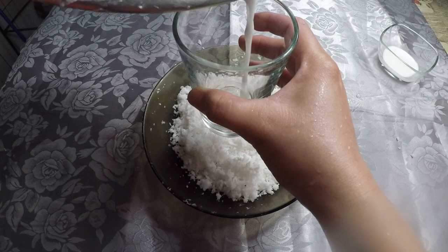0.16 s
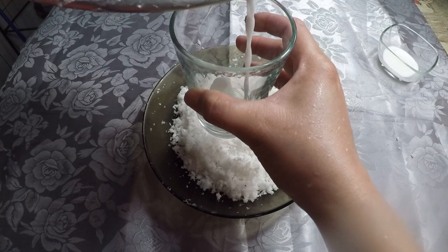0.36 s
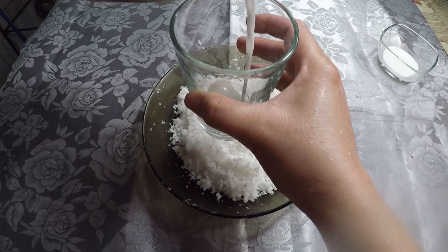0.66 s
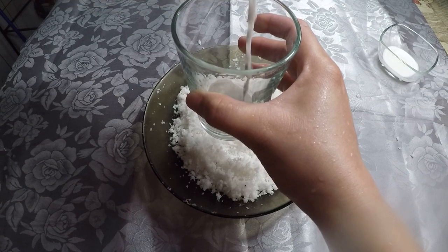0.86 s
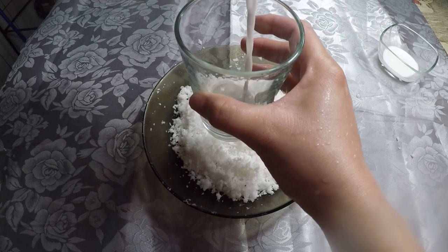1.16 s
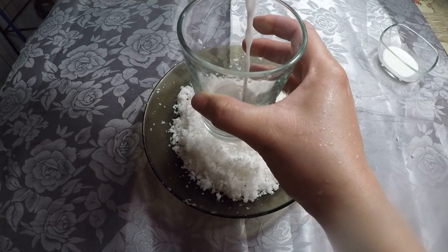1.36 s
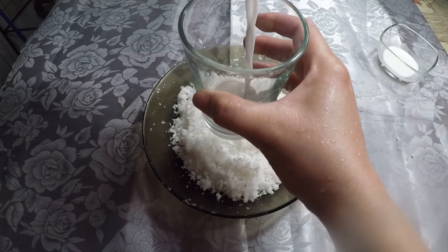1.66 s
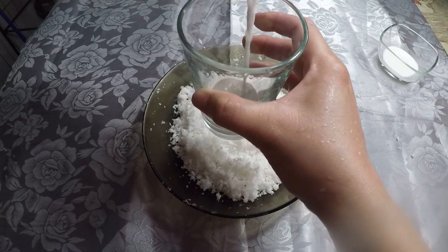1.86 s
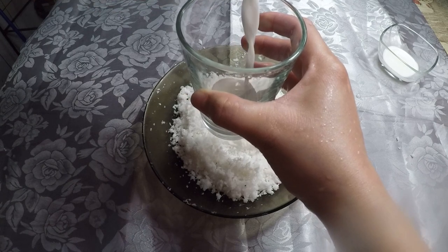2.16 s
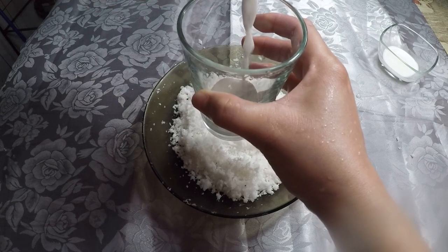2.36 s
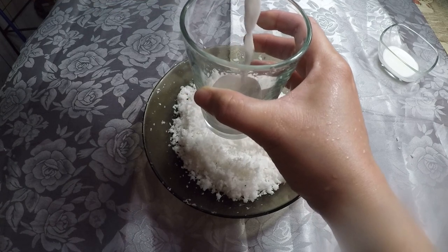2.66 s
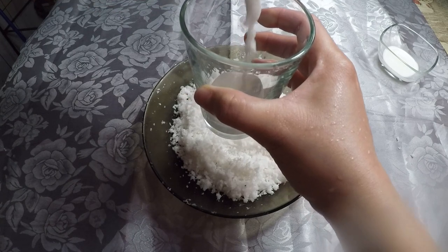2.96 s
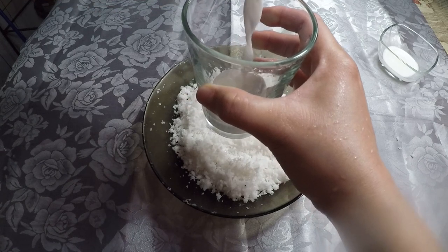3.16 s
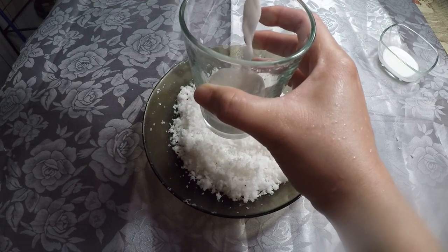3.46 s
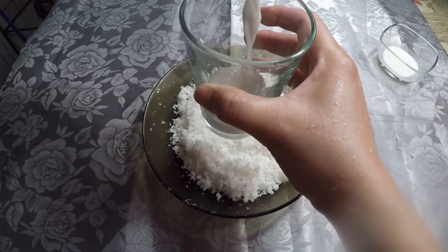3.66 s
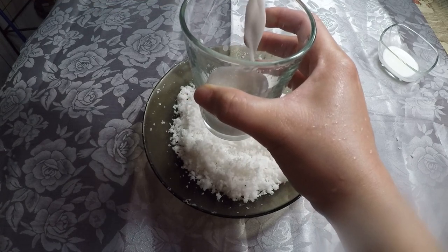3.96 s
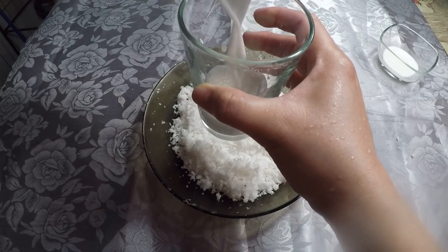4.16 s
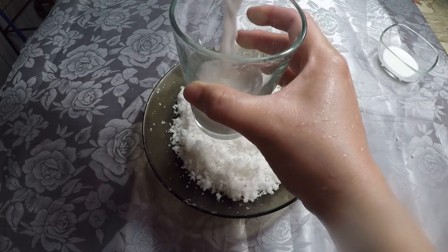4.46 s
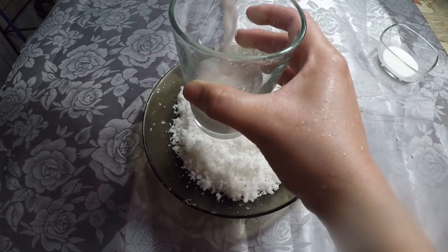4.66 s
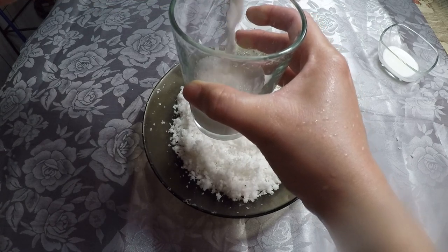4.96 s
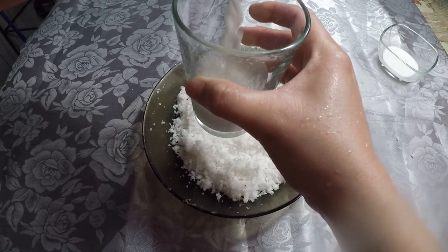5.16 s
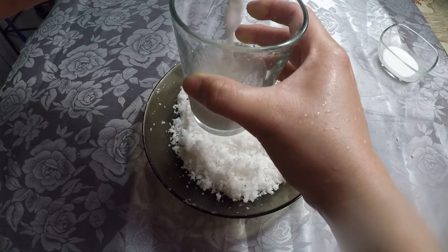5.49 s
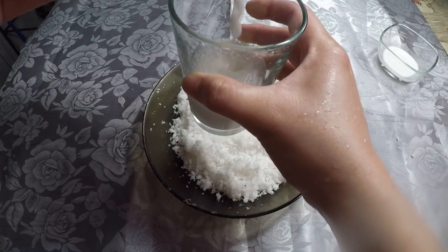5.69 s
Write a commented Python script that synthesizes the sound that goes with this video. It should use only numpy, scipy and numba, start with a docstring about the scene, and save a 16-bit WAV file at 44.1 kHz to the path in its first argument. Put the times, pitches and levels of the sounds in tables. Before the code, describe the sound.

Coconut milk squeezed by hand falls into a drinking glass in a quiet kitchen. A few light drips tick first, then a thin trickle starts, fizzing with tiny bubbles and spitting fine spray against the ringing glass. Hollow gurgles swell to their loudest midway, then ease as low plops join in the deepening liquid. The microphone is very close, with a faint room hum behind.

```python
"""Coconut milk is wrung out by hand into a tumbler close to a small two-port microphone.
Over a quiet kitchen hum and the rumble of a hand on the table, the first drops tick at 0.4 s.
From 0.9 s a trickle runs: small bubbles fizz, chirp and ring the walls, and spray spits.
Large bubbles gulp through the air column of the glass, loudest from 2 to 3.3 s.
From 3.5 s the pool is deeper and low plops join in."""
import sys
import numpy as np
from scipy import signal
from scipy.fft import rfft, irfft, next_fast_len
from scipy.io import wavfile
from scipy.ndimage import uniform_filter1d
from numba import njit

SR = 44100
rng = np.random.default_rng(int(sys.argv[2]) if len(sys.argv) > 2 else 0)


def log_audio(samples):
    """Write samples as a 16-bit WAV file to the path given in sys.argv[1]."""
    # one column per channel
    frames = np.atleast_2d(samples).T
    # limit to full scale, then quantise
    limited = np.clip(frames, -1, 1)
    pcm = np.round(limited * 32767).astype(np.int16)
    wavfile.write(sys.argv[1], SR, pcm)


N = 257103
FFT_SIZE = next_fast_len(N + 12000)
TIME_S = np.arange(N) / SR


def undb(db):
    return 10 ** (np.asarray(db) / 20)


def unit_rms(x):
    return x / np.sqrt(np.mean(x ** 2))


def decay(t, t60_s):
    return np.exp(-np.log(1000) * t / t60_s)


def at_time(table, s):
    return np.interp(s, *np.transpose(table))


def per_bin(table):
    """A (Hz, value) table read at every FFT bin."""
    hz, value = np.transpose(table)
    bin_hz = np.arange(FFT_SIZE // 2 + 1) * SR / FFT_SIZE
    return np.interp(np.log(bin_hz + 1), np.log(hz), value)


def fft_filter(x, bin_gain):
    return irfft(rfft(x, FFT_SIZE) * bin_gain, FFT_SIZE)[..., :N]


@njit
def moving_bandpass(x, hz, width_hz):
    """State-variable filter, gain 1 at its moving centre."""
    y, band_state, low_state = np.empty(len(x)), 0., 0.
    for i in range(len(x)):
        g, damping = np.tan(np.pi * hz[i] / SR), width_hz / hz[i]
        band = (band_state + g * (x[i] - low_state)) / (1 + g * (g + damping))
        band_state = 2 * band - band_state
        low_state += 2 * g * band
        y[i] = damping * band
    return y


def place(out, start_s, grain, peak_db):
    i = int(start_s * SR)
    n = min(len(grain), N - i)
    out[i:i + n] += grain[:n] * undb(peak_db) / np.abs(grain).max()


def bubble(hz, t60_s, glide, samples, rise_cycles=0.1):
    """A dying sine whose pitch climbs by the share glide within one t60."""
    t = np.arange(samples) / SR
    swell = 1 - np.exp(-t * hz / rise_cycles)
    return swell * np.sin(2 * np.pi * hz * (t + glide * t ** 2 / (2 * t60_s))) * decay(t, t60_s)


@njit
def froth(start_s, hz, gain, t60_cycles, glide):
    """Many bubbles: each swells for about a cycle, climbs in pitch and dies."""
    out = np.zeros(N)
    for k in range(len(start_s)):
        start, step = int(start_s[k] * SR), hz[k] / SR
        for i in range(min(int(t60_cycles / step), N - start)):
            turns = i * step
            envelope = (1 - np.exp(-turns)) * np.exp(-np.log(1000) * turns / t60_cycles)
            phase = 2 * np.pi * turns * (1 + glide * turns / (2 * t60_cycles))
            out[start + i] += gain[k] * envelope * np.sin(phase)
    return out


# Hum spectrum. Each row: frequency in Hz, relative density in dB.
HUM_SPECTRUM = [(62, -79), (105, -19.5), (173, -2.5), (286, -8), (346, -11), (514, -9), (633, -17),
                (703, -8.5), (781, -11.5), (4710, -32), (9990, -28.5), (15500, -24)]
# Each row: frequency in Hz, left-right correlation of the hum.
HUM_CORRELATION = [(60, -1.3), (130, 0.059), (290, -0.25), (640, -0.78), (1410, -0.71), (3100, -0.071),
                   (6820, 0.13), (15000, -0.35)]


def kitchen_hum():
    """Steady room noise; the two ports hear its midrange partly in opposition."""
    correlation = np.clip(per_bin(HUM_CORRELATION), -.95, .95)
    spectrum = undb(per_bin(HUM_SPECTRUM))
    mid, side = rng.standard_normal((2, N))
    mid = fft_filter(mid, spectrum * np.sqrt(1 + correlation))
    side = fft_filter(side, spectrum * np.sqrt(1 - correlation))
    hum = unit_rms(np.array([mid + side, mid - side]))
    return undb(-46.5) * signal.sosfilt(signal.butter(4, 120, "highpass", fs=SR, output="sos"), hum)


# Rumble envelope. Each row: time in seconds, level in dB.
RUMBLE_LEVEL = [(0.0, -66), (1.04, -77), (3.0, -76), (5.8, -90)]


def hand_rumble():
    """Dull noise of the hand on the table, partly shared by both ports."""
    lowpass = signal.butter(3, 75, fs=SR, output="sos")
    common, left, right = signal.sosfilt(lowpass, rng.standard_normal((3, N)))
    return unit_rms(np.array([left, right]) + 0.8 * common) * undb(at_time(RUMBLE_LEVEL, TIME_S))


def room_tail(x, t60_s=0.14):
    """Short diffuse reflections from table and walls, different at each port."""
    t = np.arange(12000) / SR
    tail = rng.standard_normal((2, len(t))) * decay(t, t60_s) * (t > .003)
    tail /= np.sqrt(np.sum(tail ** 2, axis=1, keepdims=True))
    tail = signal.lfilter(*signal.butter(1, [1800, 9000], "bandpass", fs=SR), tail)
    return undb(-8.5) * fft_filter(x, rfft(tail, FFT_SIZE))


# The running stream. Each row: time in seconds, gurgle in dB, air column in Hz, chirping in dB,
# fizz in dB, crosswise air mode in Hz.
STREAM = [(0.9, -68, 800, -66, -68, 6350), (1.15, -67, 830, -56, -51, 6840),
          (1.45, -49, 873, -49.5, -60, 6000), (1.74, -53, 917, -49.5, -53.5, 5660),
          (2.0, -35.5, 933, -44.5, -54, 6100), (2.29, -30, 907, -46.5, -52, 6050),
          (2.84, -24.5, 814, -39, -45, 6070), (3.4, -33.5, 825, -47.5, -47.5, 6200),
          (3.75, -39, 841, -40.5, -48.5, 6070), (4.11, -45, 964, -45, -47.5, 6300),
          (4.7, -39, 1042, -42, -50.5, 6100), (5.4, -44, 1087, -45.5, -50.5, 6200),
          (5.83, -41.5, 1087, -43, -55, 6850)]
GURGLE_DB, AIR_COLUMN_HZ, CHIRPING_DB, FIZZ_DB, CROSS_MODE_HZ = range(1, 6)  # column indices
STREAM_START_S = STREAM[0][0]


def stream(column, s):
    table = np.array(STREAM)
    return np.interp(s, table[:, 0], table[:, column])


def scatter(per_s, spread_db):
    """Random events while the stream runs: start in seconds, size in dB, pitch share 0-1."""
    draws = rng.random((int(per_s * N / SR), 3))
    when, size, share = draws[draws[:, 0] * N / SR > STREAM_START_S].T
    size_db = -spread_db * np.log(1 - .95 * size)  # mostly near 0 dB, bounded
    return when * (N - 1) / SR, size_db, share


# The clearest spits of spray. Each row: start in seconds, level in dB.
SPITS = [(0.9339, -30), (0.988, -29), (1.1025, -39), (1.9756, -18), (2.0523, -34), (2.3088, -32),
         (2.3452, -29), (2.4244, -28.5), (2.5043, -28), (2.6844, -31), (2.7233, -32), (2.7752, -27),
         (2.8874, -37), (2.9279, -36), (3.1573, -25), (3.2661, -27), (3.2955, -35), (3.4262, -29),
         (3.5485, -26), (3.6462, -29), (3.7755, -27), (3.8548, -33), (4.0977, -35), (4.1421, -29),
         (4.5716, -35), (4.783, -31), (4.9228, -38), (4.9912, -27), (5.142, -43), (5.2261, -31),
         (5.264, -31), (5.3404, -31.5), (5.3982, -33), (5.4357, -29), (5.6392, -30), (5.6761, -30)]


def spray(over_fizz_db=3):
    """Very short bright bursts, listed and random, only partly alike at the two ports."""
    band = signal.butter(2, [8500, 15500], "bandpass", fs=SR, output="sos")
    t = np.arange(800) / SR
    envelope = (1 - np.exp(-t / 0.00038)) * decay(t, 0.026)
    start_s, size_db, _ = scatter(per_s=91, spread_db=2)
    events = list(SPITS) + list(zip(start_s, size_db + stream(FIZZ_DB, start_s) + over_fizz_db))
    noise = rng.standard_normal((len(events), 3, len(t)))
    common, separate = noise[:, :1], noise[:, 1:]
    bursts = signal.sosfilt(band, (common + 3.2 * separate) * envelope)
    out = np.zeros((2, N))
    for (s, db), (left, right) in zip(events, bursts):
        place(out[0], s, left, db)
        place(out[1], s, right, db)
    return out


# Colour of the small bubbles. Each row: frequency in Hz, relative gain in dB.
SWARM_COLOUR = [(760, -6.5), (1300, -18), (1410, 4), (1800, 0.5), (2200, 3.5), (2710, -5), (3240, 2),
                (3720, -8.5), (5260, -21), (6350, -13.5), (8890, -26), (14600, -16), (16000, -32)]


def swarm(level_column, per_s, lo_hz, hi_hz, t60_cycles, glide, spread_db):
    """Small bubbles of random size over a little spray noise, following the stream."""
    start_s, size_db, share = scatter(per_s, spread_db)
    bubbles = froth(start_s, lo_hz * (hi_hz / lo_hz) ** share, undb(size_db), t60_cycles, glide)
    band = signal.butter(2, [lo_hz, hi_hz], "bandpass", fs=SR, output="sos")
    hiss = signal.sosfilt(band, rng.standard_normal(N))
    coloured = fft_filter(unit_rms(bubbles) + 0.1 * unit_rms(hiss), undb(per_bin(SWARM_COLOUR)))
    level = undb(stream(level_column, TIME_S)) * (TIME_S > STREAM_START_S)
    return unit_rms(coloured) * flare() * level


def flare(depth_db=5, settle_s=0.013):
    """Swarm gain: each loud drop stirs up the small bubbles for a moment."""
    kicks = np.zeros(N)
    for s, db, *_ in CHIRPS + TICKS:
        kicks[int(s * SR)] += undb(db)
    stirred = signal.lfilter([1], [1, -np.exp(-1 / (settle_s * SR))], kicks)
    stirred = uniform_filter1d(stirred, size=400)
    return unit_rms(undb(depth_db * np.tanh(stirred / np.mean(stirred[stirred > 0]))))


# Mid-size bubbles chirping upward. Each row: start in seconds, level in dB, pitch in Hz, splash share.
CHIRPS = [(0.4145, -33, 1960, 0.2), (0.9678, -34.5, 2840, 0.37), (0.9976, -28, 1760, 0.22),
          (1.0284, -30.5, 1600, 0.16), (1.066, -34.5, 2000, 0.17), (1.1054, -23.5, 3640, 0.45),
          (1.1159, -16, 3370, 0.4), (1.142, -20, 3500, 0.45), (1.1743, -33.5, 2520, 0.03),
          (1.249, -30.5, 2320, 0.4), (1.274, -28.5, 2070, 0.3), (1.3106, -31, 1730, 0),
          (1.3257, -23.5, 3670, 0.6), (1.355, -29.5, 1850, 0.2), (1.397, -32.5, 1860, 0.43),
          (1.4332, -19, 1250, 0.35), (1.481, -27.5, 1245, 0.37), (1.5061, -25, 1415, 0.27),
          (1.5887, -36, 1530, 0.2), (1.601, -19, 1547, 0.23), (1.7079, -22.5, 1780, 0.34),
          (1.7988, -25, 1445, 0.4), (1.8339, -27.5, 1620, 0.23), (1.8633, -29, 1430, 0.3),
          (1.8918, -26, 3630, 0.34), (1.9838, -23, 2280, 0.16), (2.0484, -22, 2900, 0.34),
          (2.1292, -23.5, 2180, 0.28), (2.146, -31.5, 3350, 0.16), (2.203, -29.5, 2550, 0.3),
          (2.36, -31, 1610, 0.36), (2.4374, -25.5, 3450, 0.3), (2.4887, -28.5, 3160, 0.2),
          (2.55, -28, 2280, 0.4), (2.6604, -24, 1904, 0.23), (3.052, -23, 2150, 0.7),
          (3.097, -22.5, 2420, 0.4), (3.1592, -19.5, 3720, 0.3), (3.2285, -25.5, 1570, 0.56),
          (3.3104, -21.5, 3230, 0.5), (3.3836, -31, 2540, 0.25), (3.4328, -22, 2160, 0.26),
          (3.5493, -24.5, 3400, 0.5), (3.7135, -33, 1300, 0.36), (3.7664, -24, 1450, 0.3),
          (3.793, -22, 3240, 0.12), (3.8193, -20.5, 1410, 0.7), (3.8546, -33, 1330, 0.2),
          (3.934, -25.5, 1260, 0.48), (3.9545, -27, 2140, 0.15), (3.9932, -27.5, 2110, 0.1),
          (4.0446, -36, 2780, 0.1), (4.161, -29, 3080, 0.18), (4.2336, -26.5, 1600, 0.5),
          (4.2837, -20.5, 1620, 0.7), (4.402, -31.5, 3200, 0.1), (4.4313, -27, 3900, 0),
          (4.444, -23.5, 3300, 0.37), (4.4783, -24.5, 2950, 0.47), (4.5188, -20, 3360, 0.32),
          (4.5575, -27, 3300, 0.2), (4.7266, -33, 1570, 0.4), (4.7845, -27, 3100, 0.2),
          (4.8209, -25, 3210, 0.57), (4.8569, -27, 3180, 0.1), (4.9232, -31, 3140, 0.32),
          (4.9673, -32.5, 3130, 0), (5.0203, -34, 1580, 0), (5.0447, -37, 1870, 0.1),
          (5.143, -20.5, 2180, 0.32), (5.2268, -28, 1420, 0.4), (5.2669, -20.5, 1560, 0.8),
          (5.433, -22.5, 1400, 0.42), (5.4572, -24.5, 3240, 0.54), (5.5207, -24.5, 2110, 0.17),
          (5.5827, -26.5, 1450, 0.3), (5.6168, -28, 2720, 0.2), (5.679, -33, 2480, 0),
          (5.6982, -25, 1940, 0.14)]
# Ticks on glass and surface. Each row: start in seconds, level in dB, pitch in Hz, splash share.
TICKS = [(0.4788, -33, 5880, 0.2), (0.5397, -27.5, 5170, 0.14), (0.6833, -37, 6640, 0.6),
         (0.7422, -47, 5800, 0.3), (0.9338, -37.5, 7400, 0.34), (0.9507, -31, 5270, 0.3),
         (1.0515, -34.5, 7230, 0.3), (1.1029, -21, 6830, 0.17), (1.1164, -26, 5200, 0.1),
         (1.1418, -22.5, 6650, 0), (1.2037, -39, 7110, 0.3), (1.2406, -30, 6760, 0.33),
         (1.3019, -25.5, 4430, 0.85), (1.3423, -31.5, 4260, 0.36), (1.6152, -33.5, 4200, 0),
         (1.7724, -28.5, 4230, 0.65), (1.9245, -26, 5850, 0.3), (1.9759, -31, 8440, 0.2),
         (2.1311, -32, 5850, 0.22), (2.228, -41.5, 5630, 0.16), (2.2762, -36, 5800, 0.4),
         (2.3331, -32.5, 6300, 0.4), (2.3461, -28, 6040, 0.34), (2.4239, -32, 5950, 0.3),
         (2.4379, -28, 4200, 0.3), (2.4588, -36, 6490, 0.3), (2.4793, -21.5, 6430, 0.3),
         (2.5301, -19.5, 4460, 0.37), (2.6209, -36, 5700, 0.1), (2.6359, -25, 4420, 0.17),
         (2.6843, -27, 5980, 0.22), (2.7566, -26, 4300, 0.1), (2.7751, -26.5, 6200, 0.45),
         (2.8085, -30, 6200, 0.14), (2.827, -26, 5870, 0.3), (2.9277, -22, 6380, 0.22),
         (2.9374, -21, 5850, 0.4), (2.9537, -29, 5900, 0.22), (3.0026, -31.5, 5760, 0.1),
         (3.0579, -30.5, 6200, 0.32), (3.0874, -30.5, 6000, 0.22), (3.1288, -23.5, 5870, 0.35),
         (3.1587, -24, 6270, 0.05), (3.245, -30, 6370, 0.4), (3.2665, -22.5, 5830, 0.5),
         (3.2959, -19.5, 4440, 0.26), (3.3304, -25, 6100, 0.1), (3.3363, -24.5, 6060, 0.13),
         (3.3852, -26, 5810, 0.3), (3.4266, -24.5, 4450, 0.5), (3.4925, -33.5, 5960, 0.3),
         (3.5104, -27.5, 6350, 0.2), (3.5483, -24, 4700, 0.34), (3.5897, -31, 6330, 0.6),
         (3.6062, -29, 6500, 0.22), (3.6466, -22.5, 4760, 0.44), (3.6765, -36, 4810, 0.22),
         (3.7209, -23, 6200, 0.24), (3.7763, -28, 4940, 0.3), (3.8551, -27.5, 4900, 0.55),
         (3.9938, -29, 4650, 0.45), (4.0442, -32.5, 4470, 0.3), (4.0687, -35, 4350, 0.1),
         (4.13, -32, 5900, 0.22), (4.2023, -26.5, 4770, 0.14), (4.2278, -30.5, 5550, 0.3),
         (4.245, -25, 4740, 0.4), (4.2842, -24, 5630, 0.46), (4.2994, -27, 5460, 0.5),
         (4.4014, -37, 6190, 0.22), (4.4194, -25, 5700, 0.36), (4.4308, -22, 4900, 0.22),
         (4.4433, -22, 5170, 0.22), (4.5301, -31, 7360, 0.1), (4.6009, -24.5, 6600, 0.06),
         (4.6179, -27.5, 5920, 0.16), (4.7306, -27, 7420, 0), (4.779, -29, 5800, 0.56),
         (4.8728, -29, 6750, 0.02), (4.9222, -22, 6770, 0.18), (4.9901, -30, 6800, 0.3),
         (5.0165, -26, 5530, 0.34), (5.0449, -28.5, 6700, 0.2), (5.0569, -31, 6540, 0),
         (5.1427, -23, 6370, 0.46), (5.2265, -25, 3930, 0.37), (5.2674, -27.5, 6600, 0.3),
         (5.3667, -31.5, 6650, 0.35), (5.3981, -32, 7100, 0.47), (5.4375, -34, 6540, 0.3),
         (5.4735, -22.5, 4300, 0.7), (5.5209, -24, 5960, 0.25), (5.6156, -40, 6740, 0.1),
         (5.6386, -32.5, 6360, 0.1)]


def drops(table, t60_cycles, glide, relative_width, splash_t60_s, rise_s=0.00043):
    """Each drop is a small bubble mixed with short splash noise around its pitch."""
    out, t = np.zeros(N), np.arange(1500) / SR
    envelope = (1 - np.exp(-t / rise_s)) * decay(t, splash_t60_s)
    for s, db, hz, share in table:
        band = signal.iirpeak(hz, 1 / relative_width, fs=SR)
        noise = rng.standard_normal(len(t))
        splash = unit_rms(signal.lfilter(*band, signal.lfilter(*band, noise))) * envelope
        tone = bubble(hz, t60_cycles / hz, glide, samples=len(t), rise_cycles=0.99)
        place(out, s, (1 - share) * tone + share * splash, db)
    return out


# Tumbler wall modes. Each row: frequency in Hz, width in Hz, relative level in dB.
WALL_MODES = [(3500, 114, -9.5), (4352, 50, -10), (5565, 83, -7.5), (7020, 230, -13)]
# Wall ring, damped by the rising liquid, then partly back. Each row: time in seconds, gain in dB.
WALL_RING = [(1.0, 14), (2.3, 16.5), (3.2, -4.5), (5.8, 9)]


def tumbler(x):
    """Splashes ring the walls, an air column overtone and a crosswise air mode."""
    walls = sum(undb(db) * signal.lfilter(*signal.iirpeak(hz, hz / width_hz, fs=SR), x)
                for hz, width_hz, db in WALL_MODES)
    walls *= undb(at_time(WALL_RING, TIME_S))
    overtone = undb(-3.5) * moving_bandpass(x, 2.934 * stream(AIR_COLUMN_HZ, TIME_S), width_hz=370.)
    cross_mode = undb(-1) * moving_bandpass(x, stream(CROSS_MODE_HZ, TIME_S), width_hz=670.)
    dip = 0.2 * moving_bandpass(x, np.full(N, 4866.), width_hz=580.)  # between two wall modes
    return x - dip + walls + overtone + cross_mode


# Plops in the deeper pool. Each row: start in seconds, level in dB.
PLOPS = [(3.547, -30), (3.635, -33), (3.713, -30.5), (3.74, -31.5), (3.768, -30), (3.791, -26),
         (3.82, -27.5), (3.871, -27.5), (3.916, -30.5), (3.963, -32.5), (4.08, -29), (4.158, -33),
         (4.208, -33), (4.234, -29), (4.293, -34), (4.323, -35.5), (4.402, -39), (4.423, -35), (4.455, -35),
         (4.489, -39), (4.51, -33), (4.549, -38), (4.594, -35), (4.721, -34), (4.867, -45), (4.904, -34),
         (4.942, -42), (5.086, -32), (5.142, -26.5), (5.197, -31), (5.27, -35.5), (5.319, -29),
         (5.436, -30.5), (5.472, -40), (5.684, -36)]
# The cavity that the stream digs. Each row: time in seconds, pitch in Hz.
CAVITY_PITCH = [(3.5, 630), (3.8, 533), (4.3, 516), (4.55, 426), (4.95, 443), (5.1, 538), (5.5, 493),
                (5.83, 566)]


def plops(t60_s=0.059, burble_db=-37):
    """Drops open a deep cavity that rings low after a soft start; weaker ones burble between."""
    loud = np.zeros(N)
    for s, db in PLOPS:
        plop = bubble(at_time(CAVITY_PITCH, s), t60_s, glide=0.065, samples=4000, rise_cycles=0.39)
        place(loud, s, plop, db)
    start_s, size_db, share = scatter(per_s=60, spread_db=0.5)
    hz = at_time(CAVITY_PITCH, start_s) * (0.896 + 0.25 * share)
    gain = undb(size_db + burble_db) * (start_s > CAVITY_PITCH[0][0])
    return loud + froth(start_s, hz, gain, t60_cycles=21., glide=0.039)


def gurgle():
    """Weak random bubbles near the pitch of the air column, which filters them."""
    start_s, size_db, share = scatter(per_s=120, spread_db=-3)
    hz = stream(AIR_COLUMN_HZ, start_s) * (0.823 + 0.37 * share)
    bubbles = froth(start_s, hz, undb(size_db), t60_cycles=25.5, glide=0.25)
    resonance = moving_bandpass(bubbles, stream(AIR_COLUMN_HZ, TIME_S), width_hz=366.)
    return unit_rms(resonance) * undb(stream(GURGLE_DB, TIME_S))


# The loudest large bubbles. Each row: start in seconds, level in dB, pitch in Hz, t60 in seconds.
GULPS = [(1.118, -37.5, 840, 0.021), (1.435, -14.5, 880, 0.011), (1.458, -24.5, 1020, 0.049),
         (1.481, -33, 830, 0.025), (1.504, -29.5, 856, 0.012), (1.601, -31.5, 810, 0.013),
         (1.908, -11.5, 920, 0.011), (1.938, -14.5, 1020, 0.023), (1.953, -10.5, 830, 0.038),
         (1.983, -19.5, 810, 0.019), (2.035, -29, 980, 0.032), (2.053, -15, 1010, 0.017),
         (2.072, -30, 886, 0.022), (2.088, -28, 1100, 0.022), (2.112, -16, 1070, 0.019),
         (2.163, -8, 863, 0.024), (2.181, -18, 845, 0.065), (2.204, -10, 835, 0.048),
         (2.239, -16, 956, 0.049), (2.259, -16.5, 960, 0.015), (2.278, -21, 850, 0.039),
         (2.301, -26, 854, 0.035), (2.334, -9.5, 1054, 0.026), (2.362, -8.5, 1040, 0.028),
         (2.386, -21, 920, 0.013), (2.407, -26, 904, 0.028), (2.425, -17, 834, 0.025),
         (2.438, -15.5, 799, 0.058), (2.461, -19.5, 820, 0.039), (2.494, -11, 816, 0.057),
         (2.53, -23, 800, 0.028), (2.551, -10, 837, 0.041), (2.562, -12, 860, 0.044),
         (2.574, -20, 844, 0.029), (2.589, -7.5, 938, 0.037), (2.597, -14, 717, 0.096),
         (2.621, -13.5, 805, 0.085), (2.644, -17.5, 860, 0.035), (2.661, -9.5, 905, 0.028),
         (2.677, -20, 770, 0.043), (2.711, -11.5, 778, 0.032), (2.717, -12.5, 753, 0.034),
         (2.743, -23, 850, 0.023), (2.772, -16, 835, 0.022), (2.778, -20.5, 850, 0.039),
         (2.794, -8, 760, 0.025), (2.801, -7.5, 790, 0.026), (2.828, -8, 826, 0.032),
         (2.847, -13, 760, 0.067), (2.869, -8.5, 800, 0.04), (2.897, -16, 796, 0.024),
         (2.938, -12, 970, 0.025), (2.954, -12, 748, 0.054), (2.985, -11, 784, 0.031),
         (3.03, -16, 840, 0.024), (3.051, -9, 887, 0.023), (3.099, -19.5, 754, 0.083),
         (3.116, -20, 810, 0.019), (3.122, -15.5, 896, 0.061), (3.19, -15, 720, 0.032),
         (3.229, -18, 786, 0.035), (3.26, -20, 856, 0.032), (3.295, -24, 805, 0.038),
         (3.311, -12, 716, 0.011), (3.324, -18, 856, 0.023), (3.372, -24, 830, 0.022),
         (3.389, -16.5, 743, 0.024), (3.42, -21.5, 725, 0.063), (3.476, -26, 735, 0.038),
         (3.494, -29.5, 797, 0.069), (3.523, -22.5, 830, 0.03), (3.625, -23.5, 696, 0.062),
         (3.713, -25.5, 1280, 0.041), (3.767, -20, 726, 0.046), (3.789, -15.5, 1110, 0.018),
         (3.856, -25.5, 990, 0.053), (3.888, -27, 1050, 0.027), (3.915, -26.5, 1140, 0.029),
         (3.988, -29, 1060, 0.022), (4.079, -23.5, 1200, 0.025), (4.158, -23, 920, 0.032),
         (4.233, -31, 1010, 0.032), (4.284, -24, 964, 0.042), (4.321, -29.5, 1130, 0.037),
         (4.492, -24.5, 1066, 0.032), (4.531, -20, 1070, 0.075), (4.584, -30, 1060, 0.056),
         (4.723, -21, 980, 0.043), (4.743, -20, 1050, 0.023), (4.757, -24, 1080, 0.026),
         (4.785, -20.5, 982, 0.032), (4.822, -17.5, 1084, 0.022), (4.841, -22.5, 972, 0.039),
         (4.869, -22, 1000, 0.014), (4.905, -32.5, 1010, 0.032), (4.942, -22.5, 956, 0.025),
         (4.99, -27, 1080, 0.023), (5.005, -26.5, 1100, 0.017), (5.021, -19.5, 1110, 0.032),
         (5.087, -24, 1040, 0.014), (5.143, -23.5, 970, 0.018), (5.196, -23, 975, 0.058),
         (5.228, -19, 1137, 0.031), (5.319, -28, 1020, 0.038), (5.343, -28.5, 1130, 0.047),
         (5.378, -27, 1080, 0.029), (5.401, -22.5, 1140, 0.032), (5.436, -16.5, 1073, 0.04),
         (5.473, -23, 940, 0.027), (5.512, -23.5, 1070, 0.057), (5.585, -20.5, 1068, 0.063),
         (5.627, -24.5, 1106, 0.045), (5.679, -33, 1140, 0.028), (5.697, -27.5, 1080, 0.032),
         (5.763, -28.5, 1160, 0.032)]


def gulps(width_hz=150, direct_gain=0.39):
    """Large bubbles drive the air column, which swells, beats and fades; some pop is heard directly."""
    out = np.zeros(N)
    for s, db, hz, t60_s in GULPS:
        column_hz = stream(AIR_COLUMN_HZ, s)
        air_column = signal.iirpeak(column_hz, column_hz / width_hz, fs=SR)
        pop = bubble(hz, t60_s, glide=0.057, samples=2200)
        place(out, s, signal.lfilter(*air_column, pop) + direct_gain * pop, db)
    return out


def mouth(x):
    """The mouth of the glass radiates little below the pitch of its air column."""
    return signal.sosfilt(signal.butter(6, 680, "highpass", fs=SR, output="sos"), x)


# Port level difference. Each row: frequency in Hz, left minus right in dB.
PORT_BALANCE = [(300, 9.5), (700, 7), (1290, 2), (2380, 2.5), (3300, -1.5), (4400, 8.5), (6300, 10),
                (8000, 7.5), (10000, -16.5), (15000, 27)]
# Port phase difference. Each row: frequency in Hz, lead of the left in radians.
PORT_LEAD = [(300, -2.6), (690, -1.7), (2070, -1.5), (3190, -.3), (6290, .2), (8200, -.2), (10300, 2.4),
             (12400, .5), (16000, 1.5)]


def mic_ports(x):
    """The two ports differ in level and phase for a source this near."""
    log_ratio = np.log(undb(per_bin(PORT_BALANCE))) + 1j * per_bin(PORT_LEAD)
    return fft_filter(x, np.exp(np.array([log_ratio, -log_ratio]) / 2))


def scene():
    """Liquid in the glass, its room tail and the kitchen, in stereo."""
    chirps = drops(CHIRPS, t60_cycles=53, glide=0.427, relative_width=0.91, splash_t60_s=0.031)
    ticks = drops(TICKS, t60_cycles=54, glide=0.051, relative_width=0.32, splash_t60_s=0.018)
    chirping = swarm(CHIRPING_DB, 700, 1238, 4270, t60_cycles=46., glide=0.84, spread_db=5)
    fizz = swarm(FIZZ_DB, 1600, 3940, 12760, t60_cycles=45., glide=0.15, spread_db=6)
    # droplets that burst after a few cycles, heard as fine clicks
    patter = swarm(CHIRPING_DB, 250, 1696, 6750, t60_cycles=6.6, glide=0.2, spread_db=10.5)
    splashes = chirps + ticks + undb(-3.5) * chirping + fizz + undb(-7) * patter
    liquid = mouth(gulps() + gurgle()) + plops() + tumbler(splashes)
    return mic_ports(liquid) + room_tail(liquid) + spray() + kitchen_hum() + hand_rumble()


# Microphone treble response. Each row: frequency in Hz, gain in dB.
MIC_RESPONSE = [(8800, -1.5), (9900, -3), (11000, -7), (15000, -18), (15700, -18), (15900, -35)]


def record(dry):
    """The microphone dulls the very top; the recorder cuts above 16.3 kHz."""
    heard = fft_filter(dry, undb(per_bin(MIC_RESPONSE)))
    return signal.sosfilt(signal.ellip(8, .2, 70, 16300, fs=SR, output="sos"), heard)


dry = scene()
out = record(dry)
log_audio(out)
```